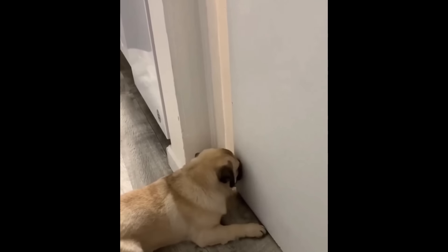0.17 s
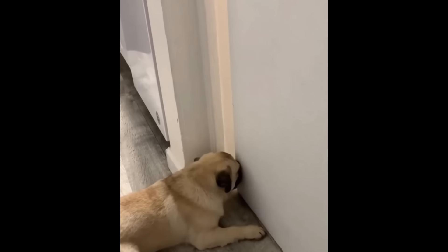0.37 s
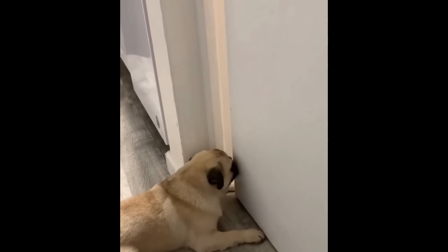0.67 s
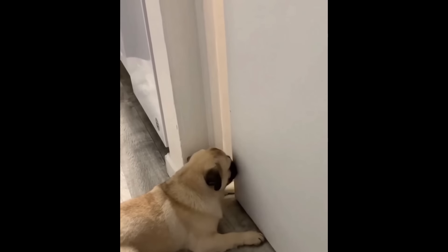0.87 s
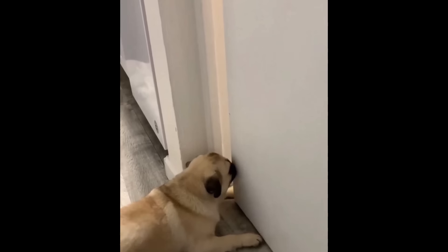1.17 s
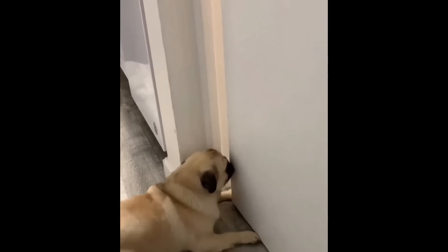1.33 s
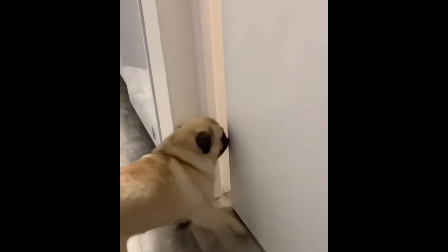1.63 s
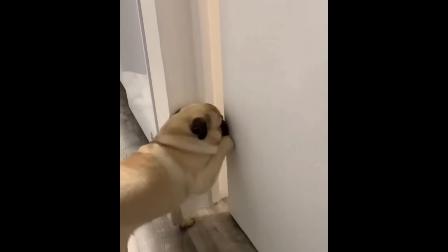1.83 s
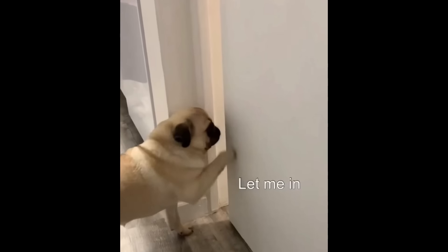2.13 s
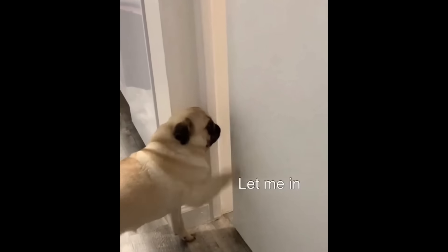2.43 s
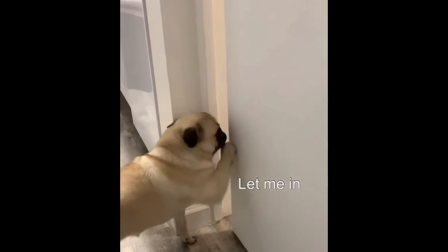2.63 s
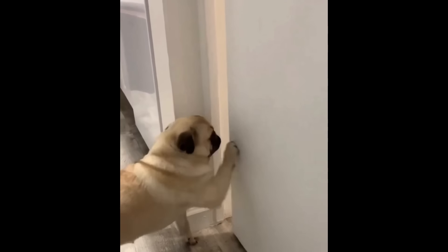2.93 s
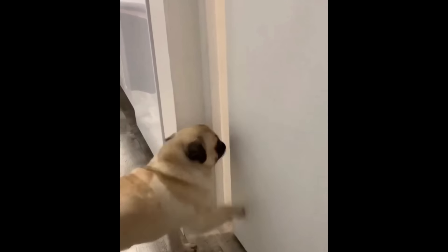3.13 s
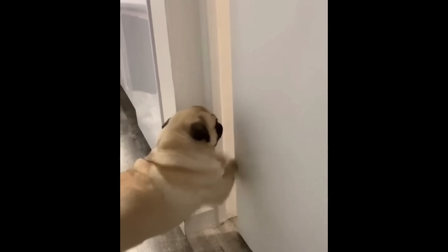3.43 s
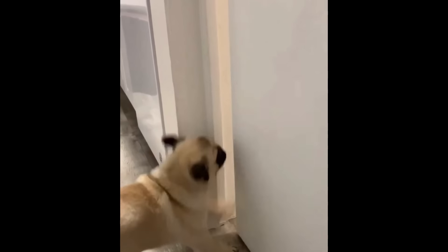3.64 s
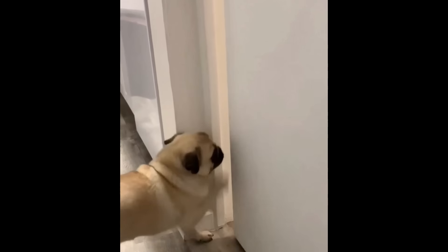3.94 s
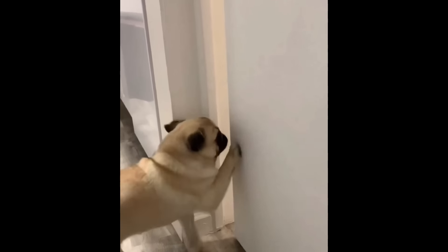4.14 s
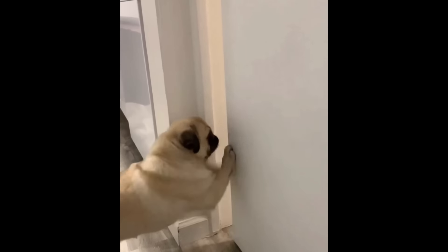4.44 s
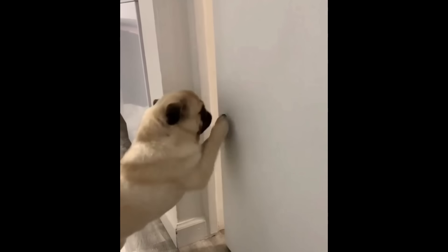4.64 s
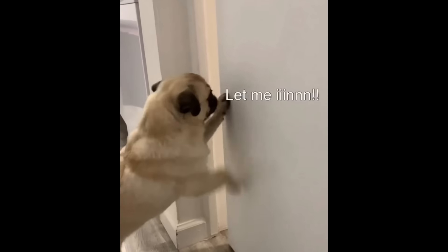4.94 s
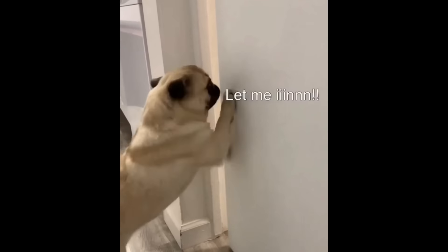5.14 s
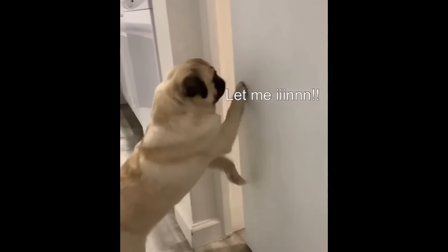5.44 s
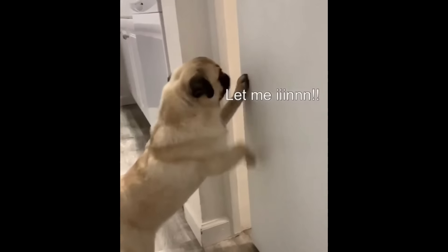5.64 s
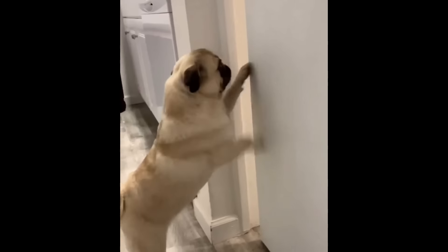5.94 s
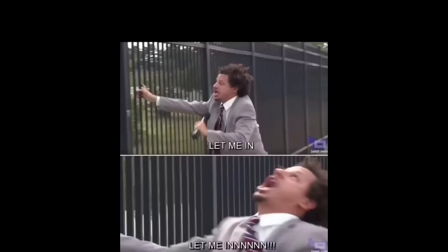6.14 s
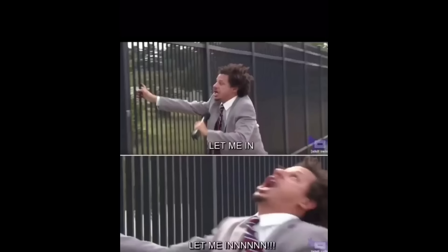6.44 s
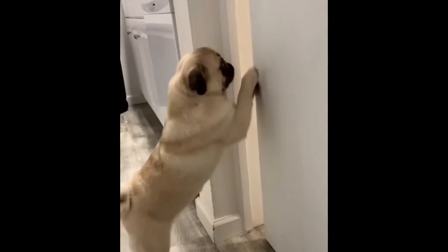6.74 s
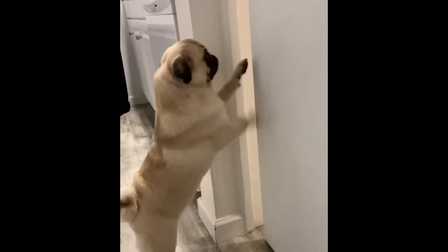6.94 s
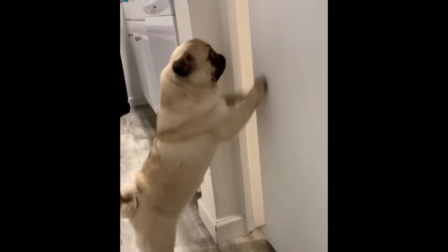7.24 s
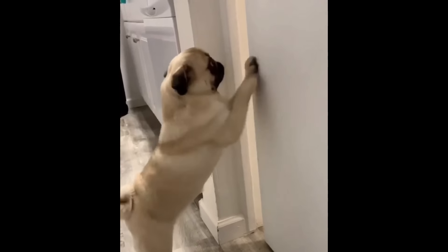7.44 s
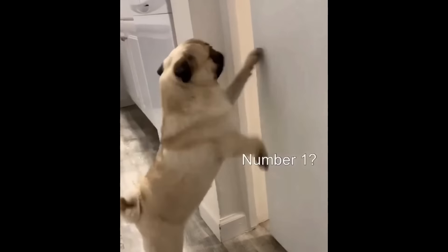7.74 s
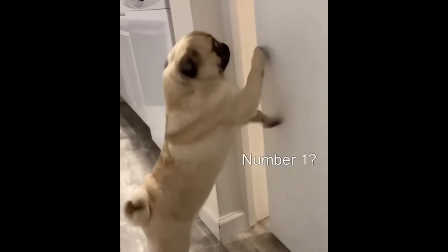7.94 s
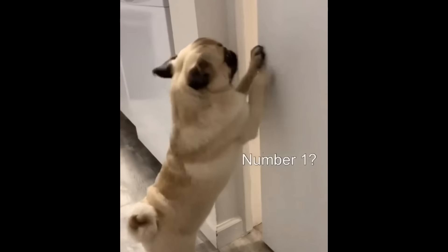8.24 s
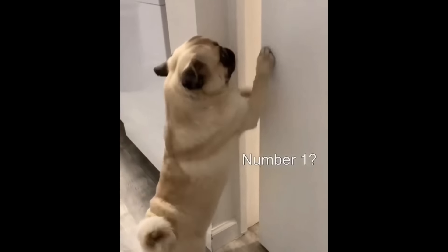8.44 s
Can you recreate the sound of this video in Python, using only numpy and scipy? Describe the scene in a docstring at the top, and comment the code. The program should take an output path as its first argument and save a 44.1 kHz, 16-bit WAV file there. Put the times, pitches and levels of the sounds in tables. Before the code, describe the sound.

In a small hard-walled room, a dog begins with a few barely audible paw bumps on a wooden door. After two seconds it rakes in earnest: hollow low booms, knocks, latch rattle, dry hissing claw scrapes, sharp snaps and short judders. Everything cuts to complete silence for about half a second, then the pawing resumes just as vigorously. Close microphone, short room tail.

```python
"""A small dog paws at a closed wooden door in a small hard-walled room.
Soft bumps come first, then harder blows: each booms in the panel, knocks, and bounces the door in its latch.
The claws rub and scrape down the paint in tiny slips, with sharp snaps and short juddering runs in between.
Booms are ringing door modes; the other sounds are shaped noise. Faint room air lies underneath.
All sound drops out from about 6.1 to 6.7 s, then the pawing goes on."""
import sys
import numpy as np
from scipy import signal
from scipy.fft import rfft, irfft, next_fast_len
from scipy.io import wavfile
from scipy.ndimage import uniform_filter1d, minimum_filter1d

SR = 44100
rng = np.random.default_rng(int(sys.argv[2]) if len(sys.argv) > 2 else 0)


def unload_audio(sound):
    """Save the sound as a 16-bit wav file, at the path given as the first command line argument."""
    columns = np.transpose(np.atleast_2d(sound))
    # keep every value between -1 and 1, then stretch to whole-number steps
    steps = np.round(np.clip(columns, -1, 1) * 32767)
    wavfile.write(sys.argv[1], SR, steps.astype(np.int16))


N = 379260
TIME = np.arange(N) / SR
ROOM_T60_S = 0.3  # time for the room's tail to fall by 60 dB, after snaps, judders and latch bounces


def from_db(db):
    """Turn decibels into a plain gain."""
    return 10 ** (np.asarray(db) / 20)


def rms_one(x):
    """Scale a sound to an rms of 1."""
    return x / np.sqrt(np.mean(x ** 2) + 1e-20)


def noise(colour, size=N):
    """Noise shaped to the given spectrum, rms 1."""
    points = np.array(colour)
    fast_size = next_fast_len(size)
    hz = np.maximum(np.fft.rfftfreq(fast_size, 1 / SR), 1)
    gain = from_db(np.interp(np.log(hz), np.log(points[:, 0]), points[:, 1]))
    shaped = irfft(rfft(rng.standard_normal(fast_size)) * gain, fast_size)
    return rms_one(shaped[:size])


def drift(points_per_s):
    """Random wander around zero: straight lines between random points of spread 1."""
    points = rng.standard_normal(8192)
    return np.interp(TIME * points_per_s, np.arange(len(points)), points)


def response(colour, crack_t60_s, tail_db, tail_t60_s):
    """Dense ringing after one contact: a quick crack plus the room's tail; starts near rms 1."""
    t = TIME[:SR * 2 // 5]
    crack = from_db(-60 * t / crack_t60_s)
    tail = from_db(tail_db - 60 * t / tail_t60_s)
    return noise(colour, size=len(t)) * np.hypot(crack, tail)


def strike(times_s, levels_db, colour, rise_s, crack_t60_s, tail_db, tail_t60_s):
    """Each contact lands on another spot and rings in its own way; fur and pad soften its start."""
    out = np.zeros(N + SR)
    for start_s, gain in zip(times_s, from_db(levels_db)):
        ringing = response(colour, crack_t60_s, tail_db, tail_t60_s)
        soft_start = 1 - np.exp(-TIME[:len(ringing)] / rise_s)
        at = int(start_s * SR)
        out[at:at + len(ringing)] += gain * ringing * soft_start
    return out[:N]


# spectrum of the quiet room: pitch_hz [Hz], level_db [dB per Hz, relative]
AIR_COLOUR = [(15, -39), (25, -11), (49, 3), (219, -10.5), (316, -11.5), (411, -13.5), (520, -14),
              (712, -20.5), (901, -19.5), (2300, -34.5), (3420, -44.5), (13000, -76)]


def room_air():
    """The faint steady sound of a quiet room, as shaped noise."""
    return from_db(-46.5) * noise(AIR_COLOUR)


STROKE_ATTACK_S, STROKE_SAG_DB_PER_S, STROKE_RELEASE_DB_PER_S = 0.025, 18.5, 227.5


def stroke(length_s):
    """Loudness of one rake: the claws set in, ease off as they slide, then lift."""
    t = TIME[:SR * 3 // 5]
    sag_db = STROKE_SAG_DB_PER_S * t
    release_db = STROKE_RELEASE_DB_PER_S * np.maximum(t - length_s, 0)
    return np.minimum(t / STROKE_ATTACK_S, 1) * from_db(-sag_db - release_db)


RUB_SHARE, RUB_PRESSURE_DB = 0.45, 7  # plain gain on the rub levels below; extra for the rasp
RUB_FLICKER_DB, RUB_FLICKERS_PER_S = 3.5, 22
BITE_FOLLOWS = 0.27  # part of the pressure dB that reaches the bite
# light rubbing between strokes while the dog lies, rears up and stands:
# start_s [s], level_db [dB, relative, before RUB_SHARE]
RUB_LYING_LEVELS = [(0.0, -67.5), (0.244, -75), (0.892, -71.5), (1.284, -59), (1.484, -62), (1.632, -60.5),
                    (1.76, -81)]
RUB_REARING_LEVELS = [(1.95, -60), (3.03, -41.5), (3.62, -45), (3.84, -55), (4.1, -67.5), (4.19, -54.5),
                      (5.04, -36.5), (5.84, -31.5), (5.95, -40)]
RUB_STANDING_LEVELS = [(6.89, -45.5), (7.144, -43.5), (7.56, -44), (7.708, -34), (8.24, -37), (8.55, -42)]
# a paw rakes down the door: start_s [s], length_s [s], level_db [dB, relative], pressure_db [dB]
RAKES = [(0.23, 0.016, -78, 17), (0.425, 0.054, -61.5, 16.5), (1.025, 0.057, -67.5, 15),
         (1.845, 0.098, -45, -13), (2.151, .17, -41.5, -1.5), (2.463, 0.11, -30.5, -0.5),
         (2.702, 0.067, -39.5, 7), (2.797, 0.022, -29, -14), (2.867, 0.039, -32, 1),
         (3.025, 0.097, -42, 6.5), (3.139, 0.02, -28.5, -19), (3.201, 0.034, -28.5, -5),
         (3.38, 0.066, -42.5, 12), (3.573, 0.22, -47.5, 3.5), (4.035, 0.049, -38, 1.5),
         (4.157, .17, -41.5, 2.5), (4.451, 0.057, -44.5, 11.5), (4.56, 0.09, -39, -3),
         (4.723, .11, -35.5, 9), (4.849, 0.12, -31.5, 3), (5.008, 0.077, -38.5, 6.5),
         (5.062, 0.062, -29.5, 0.5), (5.234, 0.13, -32.5, -7), (5.408, 0.16, -35.5, 7),
         (5.631, 0.057, -33, 1), (5.77, 0.13, -33, 4), (5.87, 0.055, -40, 14), (5.95, 0.067, -32.5, -9.5),
         (6.697, .04, -48, 7), (6.742, 0.097, -40.5, 8.5), (6.89, .06, -44, 10.5), (7.011, 0.051, -41.5, 0),
         (7.128, 0.075, -40, 8), (7.174, 0.065, -34.5, -3), (7.285, 0.073, -40, 10),
         (7.499, 0.13, -32.5, 4.5), (7.648, 0.12, -39.5, 12.5), (7.898, 0.13, -32.5, 1.5),
         (8.06, 0.047, -46.5, 14.5), (8.212, 0.19, -40.5, 4.5), (8.35, 0.082, -37, 8),
         (8.493, 0.16, -52.5, 15.5)]


def drag():
    """Strokes on top of uneven light rubbing; pressing harder adds rasp, and some bite: gives all three gains."""
    follows = np.array([[0], [BITE_FOLLOWS], [1]])  # rows: hiss, bite, rasp
    rub_points = np.vstack([RUB_LYING_LEVELS, RUB_REARING_LEVELS, RUB_STANDING_LEVELS])
    rub_db = np.interp(TIME, *rub_points.T)
    flicker_db = RUB_FLICKER_DB * drift(RUB_FLICKERS_PER_S)
    rub = RUB_SHARE * from_db(rub_db + flicker_db)
    power = (rub * from_db(follows * RUB_PRESSURE_DB)) ** 2
    for start_s, length_s, level_db, pressure_db in RAKES:
        at = int(start_s * SR)
        gains = stroke(length_s)[:N - at] * from_db(level_db + follows * pressure_db)
        power[:, at:at + gains.shape[1]] += gains ** 2
    return np.sqrt(power)


def slips(per_s, spread_db, clump_db):
    """Stick-slip of a claw: tiny jerks of uneven size that come in clumps; rms 1."""
    uneven = from_db(spread_db * np.minimum(rng.exponential(1, N), 4))
    sizes = uneven * rng.choice([-1, 1], N)
    happens = rng.random(N) < per_s / SR
    return rms_one(sizes * happens * from_db(clump_db * drift(110)))


def travelling(jerks, colour, crack_t60_s, tail_db, count=4):
    """The paw moves over the panel, so the mix of ringings that its jerks wake keeps changing; rms 1."""
    shares = np.array([drift(16) for _ in range(count)]) + 0.2
    shares /= np.linalg.norm(shares, axis=0)
    total = np.zeros(N)
    for share in shares:
        ringing = response(colour, crack_t60_s, tail_db, tail_t60_s=0.24)
        total += signal.oaconvolve(jerks * share, ringing)[:N]
    return rms_one(total)


# low ringing modes of the door panel: pitch_hz [Hz], level_db [dB, relative], t60_s [s to fall 60 dB]
DOOR_MODES = [(44.7, -3.5, 0.91), (62.82, -7.5, 1), (76, 3.5, 0.32), (111, -3, 0.45), (145, -12.5, 0.6),
              (181.2, -2, 0.26), (228.6, -17.5, 0.42), (251.3, -8, 0.48), (277.4, -8.5, 0.29),
              (428.4, -11, 0.28), (543.5, -7, 0.073)]


def door(force):
    """The panel's low modes: each is a fading sine wave woken by the force."""
    out = np.zeros(N)
    for pitch_hz, level_db, t60_s in DOOR_MODES:
        decay = from_db(-60 / (t60_s * SR))
        turn = 2 * np.pi * pitch_hz / SR  # radians per sample
        feedback = [1, -2 * decay * np.cos(turn), decay * decay]
        out -= from_db(level_db) * signal.lfilter([0, np.sin(turn)], feedback, force + 1e-18)
    return out


HISS_DB, BITE_DB, RASP_DB, SHAKE_DB = 2.5, 1.97, 2, 11  # shares of a drag
# spectra of the bright hiss, the biting edges and the rasping panel:
# pitch_hz [Hz], level_db [dB per Hz, relative]
HISS_COLOUR = [(3500, -33.5), (5300, -1), (7300, 7.5), (8300, 6.5), (10000, 3.5), (11000, -4.5),
               (11800, -56.5), (12800, 3), (14000, -12)]
BITE_COLOUR = [(1000, -5.5), (2300, -2.5), (2800, -8.5), (3900, -3), (5000, -12), (7000, -53)]
RASP_COLOUR = [(120, -9.5), (250, 3), (470, -1.5), (680, -2.5), (900, -15.5), (1200, -4), (1650, 0),
               (2350, -8), (2900, -15.5), (4500, -45)]


def scraping():
    """A bright hiss, biting edges, a rasping panel and a door shaken by the drag; gives (middle, sideways)."""
    hiss_gain, bite_gain, rasp_gain = drag()
    jerks = slips(per_s=1800, spread_db=2.2, clump_db=4.0)
    hiss = travelling(jerks, HISS_COLOUR, crack_t60_s=0.012, tail_db=-13.5)
    side_hiss = travelling(jerks, HISS_COLOUR, crack_t60_s=0.012, tail_db=-13.5)
    bite = travelling(jerks, BITE_COLOUR, crack_t60_s=0.0032, tail_db=-15.5, count=3)
    # the panel answers to the rarer, heavier catches of a whole claw
    catches = slips(per_s=700, spread_db=4, clump_db=4.5)
    rasp = travelling(catches, RASP_COLOUR, crack_t60_s=0.03, tail_db=-13)
    shake = rms_one(door(catches))
    # the heavy panel follows the drag with some delay: smoothed over 0.05 s
    step = 1 / (SR * 0.05)
    effort = np.sqrt(signal.lfilter([step], [1, step - 1], rasp_gain ** 2))
    middle = from_db(HISS_DB) * hiss_gain * hiss
    middle += from_db(BITE_DB) * bite_gain * bite
    middle += from_db(RASP_DB) * rasp_gain * rasp
    middle += from_db(SHAKE_DB) * effort * shake
    sideways = from_db(-3.5) * hiss_gain * side_hiss
    return middle, sideways


# spectrum of a claw snap: pitch_hz [Hz], level_db [dB per Hz, relative]
TICK_COLOUR = [(300, -8), (1500, 9.5), (4000, 2), (5400, -3), (8000, 8), (14000, -15)]
# a claw tip catches and snaps free: start_s [s], level_db [dB]
CLAW_SNAPS = [(0.252, -74), (1.792, -31.5), (3.5497, -23.5), (3.616, -22), (3.6638, -22), (3.728, -28),
              (4.0467, -19.5), (4.566, -26), (5.015, -26), (5.182, -21), (5.7182, -22.5), (6.835, -24),
              (7.3985, -30), (7.7987, -18.5), (8.1916, -16.5)]


def ticks():
    """Sharp snaps of single claws, each a short burst of ringing."""
    start_s, level_db = np.transpose(CLAW_SNAPS)
    return strike(start_s, level_db, TICK_COLOUR, rise_s=0.0015,
                  crack_t60_s=0.045, tail_db=-13.5, tail_t60_s=ROOM_T60_S)


def pushes(times_s, levels_db, lengths_s):
    """Smooth pulses of force: the longer the contact, the fewer modes it wakes."""
    out = np.zeros(N + SR)
    t = TIME[:SR // 20]
    for start_s, gain, length_s in zip(times_s, from_db(levels_db), lengths_s):
        pulse = t * np.exp(-t / length_s)
        at = int(start_s * SR)
        out[at:at + len(t)] += gain * pulse / pulse.sum()
    return out[:N]


# above a gentle touch the pad flattens and the contact gets shorter (dB of length per dB of force)
GENTLE_DB, CONTACT_SHORTENS = -32.5, 0.65
# a harder blow clacks more: level at 0 dB force, and dB per dB of force
CLACK_AT_FULL_DB, CLACK_FOLLOWS = -1, 1.105
LATCH_BOUNCE_S, LATCH_DB = 0.039, -18  # delay after the blow, level relative to its force
# spectra of the dull knock and the bright clack: pitch_hz [Hz], level_db [dB per Hz, relative]
KNOCK_COLOUR = [(110, -21), (180, 8), (280, 2.5), (350, -2), (440, 0), (720, -2), (950, -23.5), (1500, -36),
                (3000, -63)]
CLACK_COLOUR = [(400, -14), (650, 8.5), (1200, 5.5), (1800, -2.5), (2500, -5), (3200, -16), (5000, -26),
                (9000, -31), (14000, -52.5)]
# a paw lands on the door: start_s [s], force_db [dB, hard contact], weight_db [dB, push behind it]
PAW_BLOWS = [(0.423, -24, -17), (0.786, -45, -35), (1.021, -30, -16), (2.073, -27, -16.5),
             (2.445, -23.5, -15), (2.71, -11.5, -12), (3.035, -10.5, -10.5), (3.364, -17.5, -12),
             (3.637, -18.5, -11.5), (4.084, -37, -19), (4.453, -15.5, -13), (4.649, -38, -16),
             (4.773, -12.5, -17), (4.95, -10.5, -11), (5.216, -17, -14.5), (5.306, -7, -10),
             (5.455, -11.5, -12.5), (5.641, -14.5, -11.5), (5.811, -10, -12.5), (5.995, -14, -10.5),
             (6.707, -26.5, -19), (6.776, -23.5, -16), (7.001, -14.5, -12), (7.213, -18.5, -14.5),
             (7.556, -11, -12), (7.614, -23, -17), (7.764, -16, -11.5), (7.942, -14.5, -14),
             (8.165, -7.5, -8.5), (8.378, -11, -12.5), (8.455, -17, -20.5), (8.568, -17.5, -12)]


def blows(gentle_push_s, lag_s):
    """The paw's push makes the panel boom; its contact knocks, and again when the door meets its latch."""
    start_s, force_db, weight_db = np.transpose(PAW_BLOWS)
    shortening = from_db(CONTACT_SHORTENS * np.minimum(GENTLE_DB - force_db, 0))
    boom = door(pushes(start_s + lag_s, weight_db, gentle_push_s * shortening))
    knock = strike(start_s, force_db, KNOCK_COLOUR, rise_s=0.0032,
                   crack_t60_s=0.073, tail_db=-2.5, tail_t60_s=0.42)
    clack_db = CLACK_AT_FULL_DB + CLACK_FOLLOWS * force_db
    clack = strike(start_s, clack_db, CLACK_COLOUR, rise_s=0.0004,
                   crack_t60_s=0.072, tail_db=-10.0, tail_t60_s=0.38)
    latch = strike(start_s + LATCH_BOUNCE_S, force_db + LATCH_DB, KNOCK_COLOUR, rise_s=0.002,
                   crack_t60_s=0.06, tail_db=-14, tail_t60_s=ROOM_T60_S)
    return boom + knock + clack + latch


# spectrum of a judder: times_pitch [multiple of its pitch], level_db [dB per Hz, relative]
GRIP_COLOUR = [(.15, -14), (.5, -6), (.8, 0), (1.4, -1), (1.9, -6), (2.6, -18), (5, -32)]
# a pad or claw grips and judders down the door:
# start_s [s], end_s [s], level_db [dB, relative], slips_per_s [typical, per s], pitch_hz [Hz, of its ring]
GRIP_RUNS = [(1.86, 1.894, -37, 320, 2050), (2.156, 2.195, -33.5, 122, 1180), (2.177, 2.219, -26, 226, 646),
             (2.531, 2.563, -21.5, 475, 1700), (2.874, 2.915, -29.5, 380, 1700),
             (3.214, 3.264, -27.5, 360, 1590), (4.153, 4.26, -25, 265, 1110),
             (4.761, 4.81, -24.5, 325, 1600), (5.091, 5.148, -23, 390, 1468), (5.438, 5.49, -25, 300, 1350),
             (5.803, 5.824, -22, 400, 1400), (7.252, 7.298, -25, 180, 1250),
             (7.265, 7.341, -22.5, 277, 500)]


def judders(unevenness):
    """A gripping pad or claw lets go in a run of uneven slips, each ringing near one pitch."""
    out = np.zeros(N)
    for start_s, end_s, level_db, slips_per_s, pitch_hz in GRIP_RUNS:
        chance = rng.standard_normal((60, 2))
        gaps_s = np.exp(unevenness * chance[:, 0]) / slips_per_s
        times_s = np.cumsum(gaps_s)
        # the grip builds and lets go
        progress = np.minimum(times_s / (end_s - start_s), 1)
        swell = np.sqrt(np.sin(np.pi * progress) * np.pi / 2)
        sizes = from_db(level_db + 2 * chance[:, 1]) * swell * np.sqrt(SR / slips_per_s)
        # one single-sample impulse for each slip
        size = SR // 5
        force = np.bincount((times_s * SR).astype(int), sizes, size)[:size]
        colour = np.array(GRIP_COLOUR) * [pitch_hz, 1]
        ringing = response(colour, crack_t60_s=0.028, tail_db=-18, tail_t60_s=ROOM_T60_S)
        run = signal.fftconvolve(force, ringing / np.linalg.norm(ringing))
        at = int(start_s * SR)
        out[at:at + len(run)] += run
    return out


def scene():
    """Add all layers in the middle and spread part of the hiss between the ears."""
    scrape, sideways = scraping()
    middle = room_air() + scrape + ticks()
    middle += blows(gentle_push_s=0.0019, lag_s=0.004) + judders(unevenness=0.45)
    # only the treble differs between the ears
    treble_only = signal.ellip(6, 0.5, 70, 4100, "high", fs=SR, output="sos")
    softer_top = signal.butter(2, 10000, fs=SR, output="sos")
    side = signal.sosfilt(softer_top, signal.sosfilt(treble_only, sideways))
    return np.array([middle + side, middle - side])


SILENCE_START_S, SILENCE_END_S = 6.104, 6.708
CUTOFF_HZ = 13300


def record(dry):
    """The microphone sheds the deepest bass, tall peaks are limited, the sound drops out, the top is cut."""
    heard = signal.sosfilt(signal.butter(2, 27, "high", fs=SR, output="sos"), dry)
    is_on = (TIME < SILENCE_START_S) | (TIME > SILENCE_END_S)
    live = uniform_filter1d(1.0 * is_on, size=128)
    # a limiter turns the gain down around the tallest peaks
    room_left = np.minimum(1, 0.78 / (np.abs(heard).max(axis=0) + 1e-9))
    gain = uniform_filter1d(minimum_filter1d(room_left, size=300), size=300)
    top_cut = signal.ellip(10, 0.2, 80, CUTOFF_HZ, fs=SR, output="sos")
    return signal.sosfilt(top_cut, heard * gain * live)


dry = scene()
out = record(dry)
unload_audio(out)
```